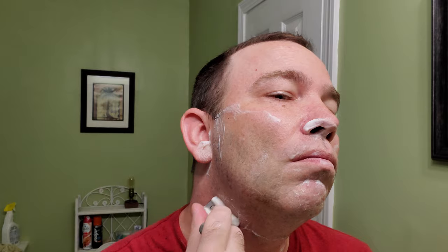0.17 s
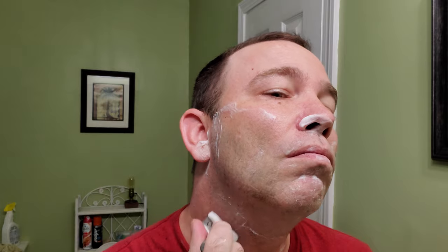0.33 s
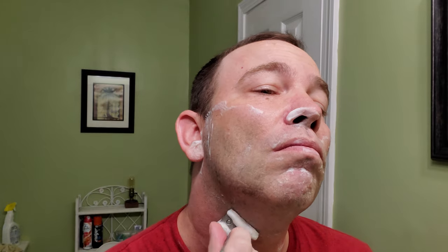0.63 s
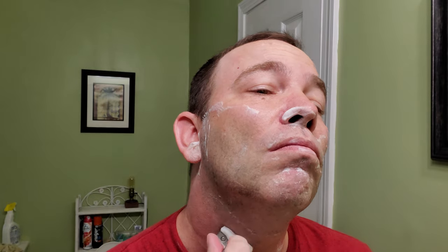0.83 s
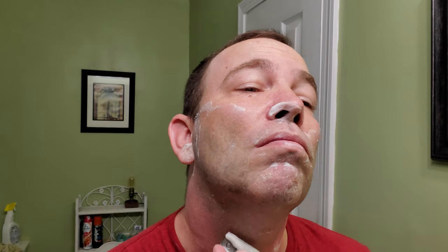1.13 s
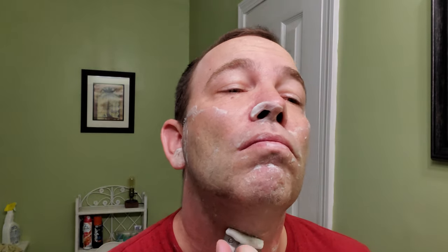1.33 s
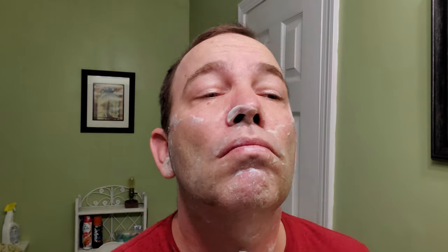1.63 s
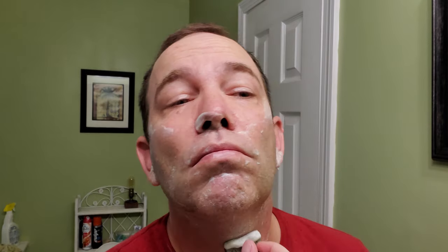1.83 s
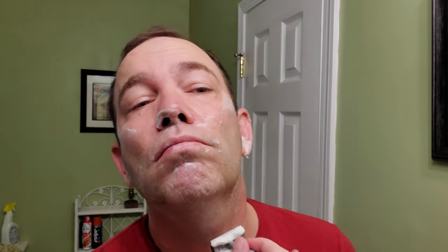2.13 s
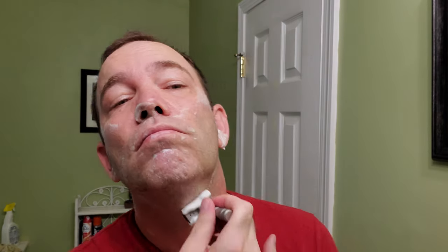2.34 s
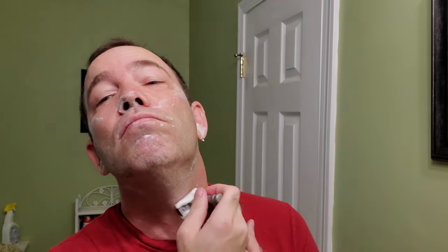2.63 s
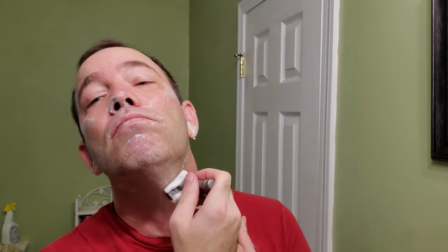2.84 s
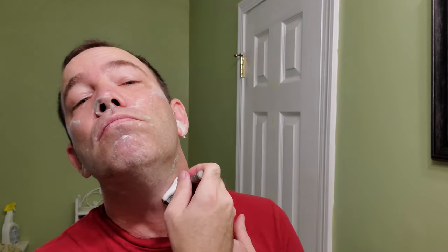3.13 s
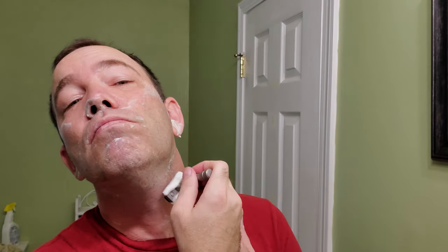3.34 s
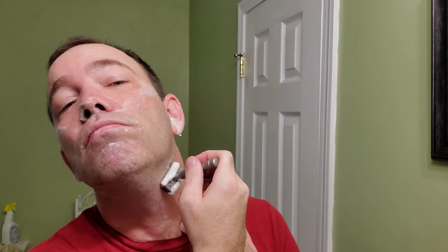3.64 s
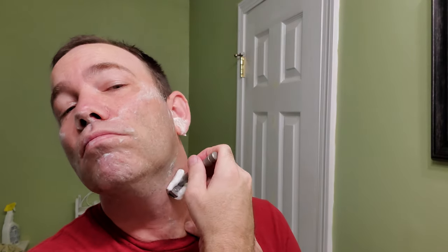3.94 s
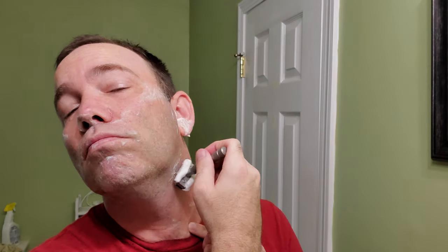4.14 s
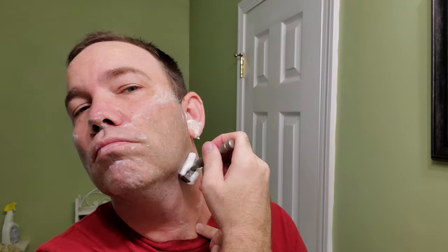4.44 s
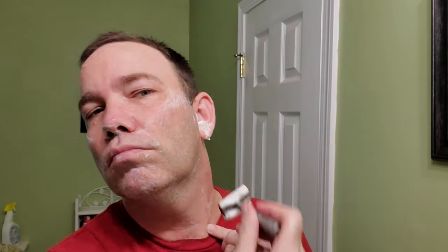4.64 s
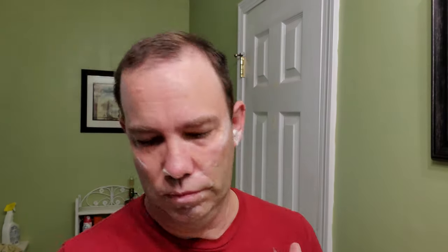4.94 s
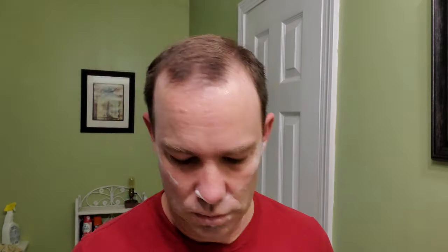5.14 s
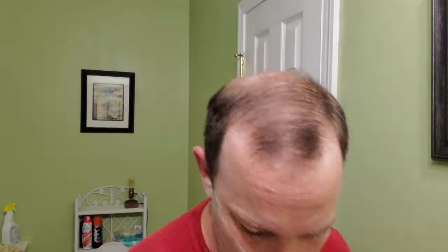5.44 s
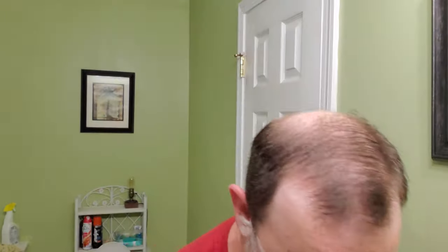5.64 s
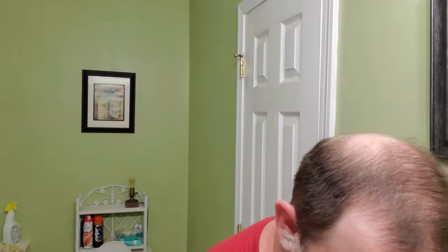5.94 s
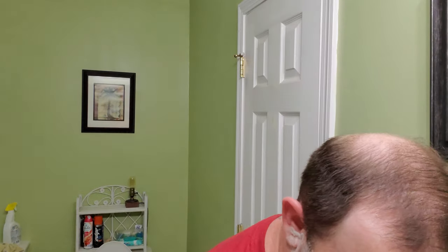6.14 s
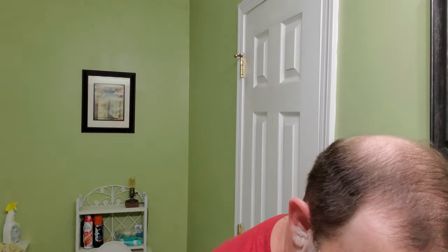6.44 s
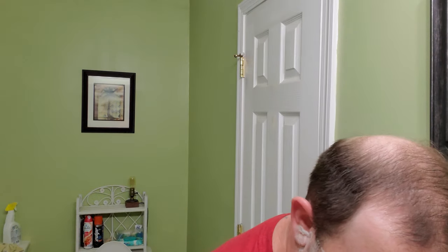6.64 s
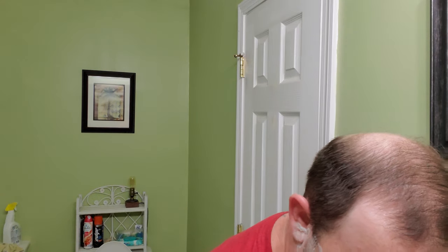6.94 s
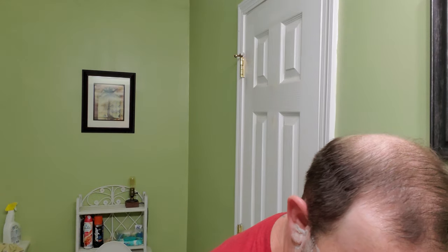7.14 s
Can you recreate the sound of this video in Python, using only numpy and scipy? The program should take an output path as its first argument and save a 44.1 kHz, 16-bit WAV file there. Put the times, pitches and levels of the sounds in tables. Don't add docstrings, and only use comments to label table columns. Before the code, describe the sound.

A razor scrapes wet stubble in short crisp strokes over a low room drone, then a tap squeaks and the blade is swished in bubbling water.

```python
import sys
import numpy as np
from scipy import signal
from scipy.fft import rfft, irfft, next_fast_len
from scipy.io import wavfile
from scipy.ndimage import uniform_filter1d

SR = 44100
rng = np.random.default_rng(int(sys.argv[2]) if len(sys.argv) > 2 else 0)


def linear_from_db(decibels):
    return 10 ** (np.asarray(decibels, float) / 20)


def dump_mix(stems):
    frames = np.atleast_2d(stems).T
    limited = np.clip(frames, -1, 1)
    pcm = np.round(limited * 32767).astype(np.int16)
    wavfile.write(sys.argv[1], SR, pcm)


N = 321048


def unit(x):
    return x / np.sqrt(np.mean(x ** 2) + 1e-20)


def along(points, hz):
    f, v = np.transpose(points)
    return np.interp(np.log(hz + 1), np.log(f + 1), v)


def sides(lead_db):
    return linear_from_db(np.array([[lead_db / 2], [-lead_db / 2]]))


def filtered(x, response):
    m = next_fast_len(N + SR // 2)
    return irfft(rfft(x, m) * response(np.fft.rfftfreq(m, 1 / SR)), m)[..., :N]


# f/Hz, likeness
ALIKE = [(60, 0.99), (130, 0.93), (290, 0.75), (640, 0.55), (1400, 0.18), (3000, 0.013)]


def pair_up(pair, hz):
    turn = np.arccos(np.clip(along(ALIKE, hz), 0, 1)) / 2
    mid, side = pair[0] * np.cos(turn), pair[1] * np.sin(turn)
    return np.array([mid + side, mid - side])


def rush(spectrum, grain=1):
    m = next_fast_len(N + SR // 5)
    hz = np.fft.rfftfreq(m, 1 / SR)
    z = rfft(grain * rng.standard_normal((2, N)), m) * linear_from_db(along(spectrum, hz))
    return unit(irfft(pair_up(z, hz), m)[:, :N])


def grains(rate, spread_db, life_s, bed):
    chance = rng.random((2, N))
    size_db = np.minimum(-spread_db * np.log(chance[1] + 1e-9), 4 * spread_db)
    kicks = (chance[0] < rate / SR) * linear_from_db(size_db)
    return unit(signal.lfilter([1], [1, -np.exp(-1 / (life_s * SR))], kicks)) + bed


def swells(s, peak_db, rise_s, fall_s, rest_db):
    t = np.arange(0, N + 128, 128)[:, None] / SR
    db = peak_db - 20 * np.where(t < s, (s - t) / np.abs(rise_s), (t - s) / np.abs(fall_s))
    return np.interp(np.arange(N) / SR, t[:, 0], 10 * np.log10(linear_from_db(2 * db).sum(1) + linear_from_db(2 * rest_db)))


def patchy(x, depth_db):
    z = signal.stft(x, nperseg=256)[2]
    field = uniform_filter1d(rng.standard_normal(z.shape[1:]), size=7, axis=0)
    field = uniform_filter1d(field, size=9, axis=1)
    return unit(signal.istft(z * linear_from_db(depth_db * unit(field)), nperseg=256)[1][:, :N])


def ringing(rows, rise, attack_s, lead_db, held=0):
    out = np.zeros((2, N + SR))
    for s, db, hz, t60 in rows:
        t = np.arange(round((held + t60) * SR)) / SR
        skew, side = rng.standard_normal(2)
        phase = 2 * np.pi * hz * (t + rise * t * t / (2 * t60)) + np.array([[0], [skew * hz / 1100]])
        envelope = linear_from_db(db - 60 * np.maximum(t - held, 0) / t60) * (1 - np.exp(-t / attack_s))
        out[:, round(s * SR):][:, :len(t)] += sides(lead_db + 1.8 * side) * envelope * np.sin(phase)
    return out[:, :N]


def held_ringing(rows, **settings):
    return sum(ringing([(s, db, hz, t60)], held=held, **settings) for s, db, hz, held, t60 in rows)


def spits(rows):
    out, t = np.zeros((2, N + 999)), np.arange(800) / SR
    f = np.fft.rfftfreq(len(t), 1 / SR) + 1
    width, t60 = 0.28, 0.014
    for s, db, hz in rows:
        colour = np.exp(-(np.log(f / hz) / width) ** 2)
        puff = unit(irfft(rfft(rng.standard_normal((2, len(t)))) * colour, len(t)))
        out[:, round(s * SR):][:, :len(t)] += linear_from_db(db - 60 * t / t60) * (1 - np.exp(-t / 0.00061)) * puff
    return sides(2.5) * out[:, :N]


# f/Hz, t60/s
TILES = [(300, 0.65), (1000, 0.23), (3000, 0.27), (8000, 0.27), (15000, 0.09)]


def walls(x):
    hz, t, z = signal.stft(rng.standard_normal((2, SR // 2)), SR, nperseg=256)
    decay = linear_from_db(-60 * t / along(TILES, hz)[:, None])
    tail = signal.istft(pair_up(z, hz[:, None]) * decay, SR, nperseg=256)[1]
    delayed = np.pad(x, ((0, 0), (150, 0)))
    return signal.fftconvolve(delayed, tail / np.linalg.norm(tail[0]), axes=1)[:, :N]


# f/Hz, level/dB per Hz
FAN = [(20, -44.5), (35, -15.5), (50, -11), (63, -2.5), (69, 2), (75, 3.5), (90, -20.5), (130, -57)]
# f/Hz, level/dB
MOTOR = [(228.3, -83), (302, -87)]
# f/Hz, level/dB per Hz
BOARDS = [(70, -40.5), (90, -4.5), (110, 7), (130, -7), (170, -17.5), (230, -15), (320, -22), (420, -52)]
# t/s, stand shake level/dB, boards level/dB
SWAYS = [(.64, -53, -70.5), (1.457, -55, -65.5), (2.09, -48, -62), (2.306, -58, -52), (2.63, -43.5, -62),
         (2.859, -49, -62.5), (3.28, -56.5, -56), (3.8, -68, -56), (4.476, -58, -56.5), (4.829, -63, -54),
         (5.198, -63, -60.5), (5.83, -45.5, -46), (6.41, -49.5, -54), (6.62, -52, -50.5), (6.85, -48, -53),
         (7.0, -47.5, -50), (7.2, -51, -55)]
# t/s, half length/s, level/dB
LULL = (5.13, 0.04, -25)
# t/s, peak level/dB, f/Hz, t60/s
BUMPS = [(2.036, -48, 79, 0.29), (2.259, -31, 116, 0.062), (2.278, -31.5, 110, 0.042),
         (2.265, -46, 320, 0.055), (2.322, -34.5, 85, 0.068), (2.351, -36, 90, 0.074),
         (2.048, -51, 166, 0.12), (2.563, -35.5, 68, 0.14), (3.39, -51, 64, 0.18),
         (3.649, -60.5, 86.1, 0.14), (3.746, -46, 115.6, 0.24), (4.484, -50.5, 124, 0.11),
         (4.949, -44.5, 143, 0.085), (5.781, -33, 73, 0.08), (5.804, -33.5, 70, 0.22)]


def floor(lull_db):
    s, stand_db, creak_db = np.transpose(SWAYS)
    fan_db = swells(s, stand_db, rise_s=0.17, fall_s=0.14, rest_db=-59.5) + lull_db
    boards_db = swells(s, creak_db, rise_s=0.15, fall_s=0.36, rest_db=-71) + lull_db
    lows = linear_from_db(fan_db) * rush(FAN) + linear_from_db(boards_db) * rush(BOARDS)
    lows += ringing(BUMPS, rise=-0.11, attack_s=0.0028, lead_db=0)
    t = np.arange(N) / SR
    for hz, db in MOTOR:
        drift = 2.5 * np.interp(t, np.linspace(0, N / SR, 30), rng.standard_normal(30))
        lows += linear_from_db(db + 2) * np.sin(2 * np.pi * hz * t + drift)
    return lows


# f/Hz, level/dB per Hz
CLOTHES = [(120, -10), (200, -4), (330, 0), (480, -3), (800, -12), (1300, -24), (4000, -48)]
# t/s, level/dB, rise/s, fall/s (for 20 dB)
RUSTLES = [(1.93, -65.5, 0.33, -0.1), (2.265, -58, .012, 0.35), (2.4, -79, .1, -3), (2.66, -71.5, .1, 0.32),
           (3.43, -64, 0.11, .15), (3.655, -64, 0.013, 0.29), (3.82, -67, 0.25, 0.2), (4.5, -77, .06, 0.1),
           (4.8, -65, 0.16, 0.46), (5.0, -65, 0.16, 0.15), (5.5, -65, 0.11, 1), (5.72, -65, 0.25, 0.56),
           (5.83, -42.5, 0.067, 0.13)]


def clothes(lull_db):
    sleeve = [(row[0], -80, .2, .2) for row in STROKE]
    level_db = swells(*np.transpose(RUSTLES + sleeve), -89) + 0.35 * lull_db
    return linear_from_db(level_db) * rush(CLOTHES, grains(rate=49, spread_db=-2, life_s=0.014, bed=1.8))


# f/Hz, level/dB per Hz
HISS = [(90, -40.5), (170, -7), (280, -11), (420, -28), (1100, -18), (4500, -25.5)]
HISS_TOP = [(8400, -34), (11000, -31), (16000, -33)]
# f/Hz, level/dB per Hz
COTTON = [(2500, -30), (4000, -1.5), (6500, 2.5), (8500, -12), (12000, -3.5), (16000, -7)]
# t/s, level/dB, rise/s, fall/s
COLLAR = [
    (4.75, -88, .25, .3),
    (4.98, -89, .25, .3),
    (5.2, -85, .2, .2),
]
# t/s, peak level/dB, f/Hz
TICKS = [
    (0.55, -75, 5400),
    (5.178, -68, 3800),
    (5.178, -72, 8480),
    (5.18, -72, 13000),
]


def room():
    middle, half, dip_db = LULL
    lull_db = dip_db * np.exp(-((np.arange(N) / SR - middle) / half) ** 2)
    lows = floor(lull_db) + clothes(lull_db)
    lows[1] = np.roll(lows[1], 4)
    collar = linear_from_db(swells(*np.transpose(COLLAR), -110)) * rush(COTTON)
    return sides(1.8) * lows + linear_from_db(-82) * rush(HISS + HISS_TOP) + collar + spits(TICKS)


TAP_S = 5.45
# t/s, surface level/dB, deep water level/dB
SWISHES = [(5.832, -38.5, -40.5), (5.97, -47, -51), (6.06, -43, -62), (6.285, -37, -50), (6.43, -44.5, -65),
           (6.549, -36, -86.5), (6.599, -33, -43), (6.678, -30, -55), (6.721, -35.5, -31), (6.8, -50, -22),
           (6.869, -29, -24), (6.97, -36, -26), (7.078, -34.5, -22.5), (7.19, -33, -33.5), (7.28, -30, -47)]


def flow():
    s, surface, deep = np.transpose(SWISHES)
    since = np.arange(N) / SR - TAP_S
    tap = linear_from_db(np.minimum(-80.5 + 45 * since, -65.5)) * np.clip(since / 0.068, 1e-3, 1)
    stir = linear_from_db(swells(s, surface, rise_s=0.094, fall_s=0.42, rest_db=-140))
    fizzing = linear_from_db(swells(s, surface, rise_s=0.094, fall_s=0.43, rest_db=-140))
    jet = (since > 0) * linear_from_db(-79)
    slosh_db = swells(s, deep, rise_s=0.031, fall_s=0.18, rest_db=-140)
    churn_db = 10 * np.log10(stir ** 2 + tap ** 2)
    fizz_db = -9 + 10 * np.log10(fizzing ** 2 + tap ** 2)
    spray_db = 10 * np.log10((linear_from_db(-15.5) * stir) ** 2 + tap ** 2 + jet ** 2)
    return slosh_db, churn_db, fizz_db, spray_db


def swarm(level_db, count, hz, spread, cycles):
    draw = rng.random((count, 3))
    s = TAP_S + draw[:, 0] * (N / SR - TAP_S) * .999
    odds = np.log(draw[:, 1] / (1 - draw[:, 1]) + 1e-9)
    pitch = hz * np.exp(spread * odds.clip(-2.5, 2.5))
    db = level_db[(s * SR).astype(int)] - 3 * np.log(draw[:, 2] + 0.2)
    return ringing(zip(s, db, pitch, cycles / pitch), rise=0.21, attack_s=0.0022, lead_db=3)


# f/Hz, level/dB per Hz
SLOSH = [(200, -33), (400, -0.5), (550, 5), (750, -1.5), (1000, 3), (1500, -41)]
CHURN = [(560, -47), (950, -5.5), (1300, -4.5), (1700, -0.5), (2400, -2.5), (3200, -6.5), (5600, -35)]
FIZZ = [(2100, -39), (3600, 0.5), (5000, -0.5), (6800, -6), (7800, -23), (11000, -45)]
SPRAY = [(3300, -15), (7500, -5), (10100, -3), (11800, 0), (13700, -7), (15200, -0.5), (16000, -24)]


def churning(slosh_db, churn_db, fizz_db, spray_db):
    lumps = rush(SLOSH, grains(rate=45, spread_db=-6, life_s=0.013, bed=0.59))
    surface = patchy(rush(CHURN, grains(rate=90, spread_db=3.5, life_s=0.004, bed=1.1)), depth_db=3)
    fine = grains(rate=250, spread_db=2, life_s=.003, bed=1.3)
    bed = linear_from_db(np.minimum(slosh_db - 2, -37)) * sides(1.51) * lumps
    bed += linear_from_db(churn_db - 4.5) * sides(4.5) * surface
    bed += linear_from_db(fizz_db - 3.5) * sides(1.7) * rush(FIZZ, fine)
    return bed + linear_from_db(spray_db - 2) * sides(1.5) * patchy(rush(SPRAY, fine), depth_db=2)


# t/s, peak level/dB, spray level/dB relative to the slap
SPLASHES = [(5.71, -60, 5), (5.823, -36.5, 6.5), (6.054, -35, -18), (6.212, -32, -13), (6.27, -44, -22),
            (6.3117, -31, -20), (6.458, -35, -21), (6.482, -35, -24), (6.5, -28, -18), (6.5663, -31, -15.5),
            (6.5734, -32, -23), (6.627, -28.5, -20), (6.671, -25.5, -5), (6.734, -34.5, 4.5),
            (6.7554, -48, -22), (6.7963, -31.5, -16), (6.853, -27, -11), (6.877, -19.5, -14),
            (6.986, -24.5, -12), (7.0553, -27, -22), (7.075, -21.5, -16), (7.144, -26.5, -7)]
# t/s, level/dB, t60/s
TICK = (5.709, -56, .09)


def splashes():
    (slap, flick), t = np.zeros((2, N + 999)), np.arange(900) / SR
    for s, db, spray in SPLASHES:
        start = round(s * SR)
        slap[start:][:len(t)] += linear_from_db(db + 2.5 - 60 * t / 0.036) * (1 - np.exp(-t / 0.0016))
        flick[start:][:len(t)] += linear_from_db(db + spray - 60 * t / 0.024) * (1 - np.exp(-t / 0.0012))
    s, db, t60 = TICK
    since = np.arange(SR // 9) / SR
    flick[round(s * SR):][:len(since)] += linear_from_db(db - 60 * since / t60)
    body = linear_from_db(-8.5) * rush(CHURN) + linear_from_db(-7.5) * rush(FIZZ)
    return slap[:N] * body + flick[:N] * rush(SPRAY)


# t/s, peak level/dB, f/Hz, t60/s
GLUGS = [(5.803, -30.5, 630, 0.019), (5.811, -27.5, 562, 0.052), (5.85, -34, 560, .05),
         (5.83, -34, 500, .05), (5.733, -46, 970, .03), (5.928, -37, 870, 0.036), (5.99, -36.5, 843, 0.036),
         (6.057, -27.5, 1010, 0.03), (6.269, -19, 990, .022), (6.294, -26, 1037, 0.027),
         (6.335, -33.5, 1020, 0.047), (6.515, -34.5, 986, 0.12), (6.582, -35.5, 758, 0.11),
         (6.788, -24, 824, 0.038), (7.178, -26, 934, 0.054), (6.065, -29.5, 967, 0.028),
         (6.372, -37, 1010, 0.027), (6.642, -32, 1060, 0.032), (6.789, -39, 424, .05),
         (6.866, -22.5, 558, 0.061), (6.91, -19, 633, 0.036), (6.755, -22, 986, 0.043),
         (6.868, -22.5, 860, 0.052), (6.925, -26.5, 754, 0.043), (6.105, -38, 1024, 0.081),
         (7.001, -25, 957, 0.049), (7.068, -22, 907, 0.059), (7.144, -24, 506, 0.041),
         (7.226, -27, 492.6, 0.13)]
# t/s, peak level/dB, f/Hz
DRIPS = [(5.783, -40, 2700), (5.8045, -33.5, 1375), (5.8324, -21.5, 2825), (5.8967, -30, 2400),
         (5.991, -42, 1350), (6.1188, -32, 2700), (6.2603, -25, 1870), (6.292, -18, 2990),
         (6.4075, -30.5, 1720), (6.458, -22.5, 4250), (6.4962, -26.5, 2630), (6.557, -20.5, 2760),
         (6.5816, -22.5, 3350), (6.5938, -24, 1670), (6.7973, -19, 5100), (6.8626, -15, 2450),
         (6.932, -22, 2540), (6.987, -19.5, 2440), (7.0046, -24, 1350), (7.0553, -22.5, 2920),
         (7.0753, -17, 4260), (7.099, -18.5, 1960), (7.1753, -29, 2990), (7.204, -31, 2410),
         (6.595, -19.5, 2510), (6.87, -17.5, 2850), (7.003, -21, 2570), (7.057, -21, 4800),
         (6.722, -20, 2300), (6.684, -20, 2320), (7.272, -24, 2480), (7.088, -27, 2540),
         (6.337, -35.5, 1600), (6.508, -29, 2250)]
# t/s, peak level/dB, f/Hz
HIGH_DROPS = [(5.7683, -51, 3200), (5.896, -34.5, 3950), (5.9289, -37.5, 4520), (5.9968, -43, 3260),
              (6.055, -34, 4560), (6.1863, -53, 3390), (6.2123, -39, 3120), (6.2402, -55, 3170),
              (6.27, -31, 3110), (6.3114, -30, 3000), (6.3668, -31, 3030), (6.4822, -35, 5000),
              (6.4983, -25.5, 4710), (6.6248, -23.5, 3510), (6.671, -21.5, 3270), (6.7262, -24, 3660),
              (6.7545, -30, 4020), (6.8765, -26, 4580), (6.9865, -21, 3570), (7.1482, -23.5, 4050),
              (7.206, -25.5, 3270), (7.256, -18, 3230)]
# t/s, peak level/dB, f/Hz
PLIPS = [
    (5.911, -38, 1790),
    (5.9288, -40, 1930),
    (6.0065, -37, 1730),
    (6.1945, -40, 1700),
    (6.2164, -32.5, 2730),
    (6.387, -34, 2010),
    (6.5056, -34, 2320),
    (6.6352, -29, 1590),
]
# t/s, peak level/dB, f/Hz
SPITS = [(5.744, -53, 11900), (5.812, -56, 9000), (6.042, -56, 11000), (6.058, -41.5, 12000),
         (6.096, -43, 8500), (6.2, -50, 13000), (6.282, -40, 12600), (6.345, -38.5, 9050),
         (6.466, -40.5, 10800), (6.522, -37.5, 11500), (6.555, -34, 6950), (6.637, -34, 11000),
         (6.822, -32, 15000), (7.008, -39, 12000), (7.062, -27, 12100), (7.089, -27.5, 7060),
         (7.202, -46, 8000), (7.229, -41, 13000), (7.256, -40, 11700), (7.274, -38, 9500)]
# t/s, level/dB, f/Hz, held/s, t60/s
HELD_DROPS = [
    (6.04, -32.5, 2360, 0.0052, 0.0054),
    (6.209, -39.5, 1620, 0.0077, .005),
    (5.828, -41, 2865, 0.0078, 0.015),
    (6.593, -32, 1701, 0.019, 0.024),
    (6.622, -36, 1600, 0.028, .015),
    (6.654, -31, 985, 0.026, 0.017),
    (6.704, -31.5, 1600, 0.017, .01),
    (6.706, -35.5, 800, 0.017, 0.0049),
    (6.677, -26, 2000, 0.01, .012),
    (7.255, -23, 2410, 0.0047, .006),
]


def bubbles(slosh_db, churn_db, fizz_db):
    wet = swarm(np.minimum(slosh_db - 0.5, -33), count=90, hz=733, spread=0.171, cycles=47)
    wet += swarm(churn_db, count=120, hz=2237, spread=0.2134, cycles=53)
    wet += swarm(fizz_db - 1, count=140, hz=4800, spread=0.15, cycles=23)
    wet += ringing(GLUGS, rise=0.037, attack_s=0.00069, lead_db=3)
    drips = [(s, db, hz, 30 / hz) for s, db, hz in DRIPS]
    drops = [(s, db + 2, hz, 40 / hz) for s, db, hz in HIGH_DROPS + PLIPS]
    wet += ringing(drips, rise=0.029, attack_s=0.00027, lead_db=9)
    wet += ringing(drops, rise=0.061, attack_s=0.00026, lead_db=7) + spits(SPITS)
    return wet + held_ringing(HELD_DROPS, rise=0.0064, attack_s=0.00031, lead_db=6.5)


# t/s, level/dB
CLANK = (5.822, -31)
# f/Hz, level/dB, t60/s
CHROME = [(2650, -2, .05), (8640, -6, .02), (10690, -10, .02), (11420, -2, .025), (14500, -6, .02)]


def clank():
    s, level_db = CLANK
    modes = [(s, level_db + db, hz, t60) for hz, db, t60 in CHROME]
    return ringing(modes, rise=0, attack_s=0.00064, lead_db=2)


# t/s, level/dB, f/Hz, held/s, t60/s
GULP = [
    (6.704, -15.5, 427, 0.023, 0.006),
    (6.733, -24.5, 427, 0.033, 0.091),
    (7.191, -25, 495.6, 0.016, 0.073),
]


def water():
    slosh_db, churn_db, fizz_db, spray_db = flow()
    bed = churning(slosh_db, churn_db, fizz_db, spray_db)
    wet = splashes() + bubbles(slosh_db, churn_db, fizz_db) + clank()
    pockets = held_ringing(GULP, rise=0.0083, attack_s=0.0012, lead_db=0.5)
    return bed + wet + pockets + walls(linear_from_db(-4.5) * wet + linear_from_db(-15) * pockets)


# start t/s, end t/s, start f/Hz, end f/Hz, level/dB
SQUEAK = [
    (5.437, 5.52, 10200, 15800, -76),
    (5.51, 5.6, 14000, 15500, -81),
    (5.46, 5.52, 11300, 12100, -74),
    (5.53, 5.57, 11000, 11200, -76),
    (5.575, 5.68, 11900, 11600, -71),
    (5.52, 5.6, 8400, 9000, -82),
    (5.51, 5.57, 5950, 6250, -79),
    (5.59, 5.68, 6600, 6200, -73),
    (5.62, 5.7, 15100, 14400, -77),
]
# f/Hz, level/dB per Hz
PIPE = [(400, -11), (850, -1.5), (1000, 1), (1250, -12), (1950, -17), (2170, -3.5), (2400, -27),
        (4000, -39)]


def squeak():
    out = np.zeros(N)
    rough = unit(uniform_filter1d(rng.standard_normal(N), size=90))
    for start, end, hz0, hz1, db in SQUEAK:
        span = slice(round(start * SR), round(end * SR))
        u = np.linspace(0, 1, span.stop - span.start)
        arch = np.sin(np.pi * u)
        hz = (hz0 + (hz1 - hz0) * u ** .6) * (1 + .03 * arch)
        phase = 2 * np.pi * np.cumsum(hz * (1 + 0.005 * rough[span])) / SR
        out[span] += linear_from_db(db - 1.5) * abs(arch) ** .5 * np.sin(phase)
    flow_db = swells(5.703, -63, rise_s=0.4, fall_s=0.36, rest_db=-140)
    whistle = linear_from_db(flow_db) * (np.arange(N) > TAP_S * SR) * rush(PIPE)
    return sides(5.4) * (out + whistle)


# t/s, rise/s, half the decay time/s, level/dB
SWIPE = (3.385, .018, .16, -67)
# f/Hz, level/dB per Hz
SKIN = [(250, -21), (700, -11), (1400, -4), (2300, -9), (3500, -4.5), (4500, -11), (7000, -17), (9000, -30)]


def swipe():
    s, rise, t60, db = SWIPE
    t = np.maximum(np.arange(N) / SR - s, 0)
    envelope = linear_from_db(db - 60 * np.maximum(t - .05, 0) / (2 * t60)) * (1 - np.exp(-t / rise))
    return envelope * rush(SKIN)


# f/Hz, level/dB per Hz
BLADE = [(4000, -26), (7000, -19.5), (9000, -15), (10600, -3.5), (12800, 3.5), (15000, 0.5), (16000, -4)]
# t/s, peak level/dB
SNAPS = [(0.1895, -38), (0.1965, -38), (0.5881, -50), (0.6065, -43), (0.6154, -41), (0.6354, -37),
         (0.6524, -36), (0.6687, -38), (0.7043, -48), (1.0021, -39), (1.022, -31), (1.0307, -31.5),
         (1.0412, -42), (1.4057, -40), (1.4305, -31), (1.4444, -37), (1.4686, -35), (1.9375, -49.5),
         (1.956, -45), (1.9764, -37.5), (1.9866, -27), (1.9934, -35), (2.0008, -25), (2.0107, -32),
         (2.0154, -39), (2.3271, -46), (2.4114, -43), (2.4174, -28), (2.422, -26.5), (2.425, -30),
         (2.4456, -23), (2.8254, -59), (3.2779, -51), (3.6476, -48.5), (4.0163, -54), (4.4777, -47)]


def snaps():
    out, t = np.zeros((2, N)), np.arange(160) / SR
    colour = linear_from_db(along(BLADE, np.fft.rfftfreq(len(t), 1 / SR)))
    for s, db in SNAPS:
        noise = irfft(rfft(rng.standard_normal((2, len(t)))) * colour, len(t))
        snap = sides(9.7) * noise * linear_from_db(-60 * t / 0.006) * (1 - np.exp(-t / 0.0007))
        out[:, round(s * SR):][:, :len(t)] += linear_from_db(db) * snap / abs(snap.mean(0)).max()
    return out


def resonance(f, centre, width):
    return 1j * f * width / (centre * centre - f * f + 1j * f * width)


# middle t/s, half length/s, cutting level/dB, rasp level/dB, rasp earlier by t/s
STROKE = [(0.211, 0.026, -50.5, -62, 0.039), (0.635, 0.054, -50.5, -64, 0.017),
          (1.007, 0.045, -53.5, -58.5, 0.027), (1.449, 0.049, -50, -63, 0.026),
          (1.989, 0.036, -41.5, -58, 0.022), (2.425, 0.051, -41, -60, 0.022),
          (2.85, 0.034, -54.5, -75.5, .03), (3.289, 0.064, -64.5, -69.5, 0.04),
          (3.664, 0.032, -60, -79.5, 0.041), (4.056, 0.1, -69, -74.5, 0.026),
          (4.462, 0.097, -67, -69, 0.033)]
# further earlier by t/s, rise/s, fall/s, share that tips over
RASP = [(0.027, 0.026, .1, 0.43), (-0.026, 0.11, 0.044, .1), (-0.0019, 0.068, 0.073, 0.11),
        (-0.012, 0.076, 0.048, 0.11), (0.0037, 0.055, 0.064, .1), (0.0049, .06, 0.056, .1),
        (0.0042, 0.053, .07, 0.22), (0.019, 0.052, 0.12, .7), (0.012, .03, 0.07, .2), (0, 0.069, 0.074, .9),
        (0.0059, 0.048, 0.085, 0.56)]
# f/Hz, width/Hz, level/dB
HEAD = [(1978, 830, -1), (1340, 720, -17)]
# f/Hz, width/Hz, level/dB, turn/s
TIPPED = (1582, 499.5, 1.5, .05)
# f/Hz, level/dB per Hz
GLIDE = [(300, -12.5), (1000, -17), (3500, -8.5), (4600, -2), (6800, -2.5), (8500, -13), (11000, -17.5)]


def razor():
    cut, rub, late, slide = np.zeros((4, 2, N))
    tip_hz, tip_width, tip_db, tip_s = TIPPED
    for (s, half, cut_db, rasp_db, early_s), (shift_s, rise_s, fall_s, tips) in zip(STROKE, RASP):
        near = slice(max(round((s - .3) * SR), 0), round((s + .3) * SR))
        t = np.arange(near.start, near.stop) / SR - s

        def bell(early, width):
            return sides(2.5) * linear_from_db(-14 * ((t + early) / width) ** 2)

        landed = np.clip((t + early_s + 2.1 * half) / 0.026, 0, 1)
        skirt = linear_from_db(-14) * bell(-0.02, 0.14) * (0.46 + 0.6 * landed)
        cut[:, near] += linear_from_db(cut_db - 2.5) * (bell(0, half) + skirt)
        top = early_s + shift_s
        press = linear_from_db(rasp_db) * bell(top, np.where(t < -top, rise_s, fall_s))
        tipped = np.clip(tips, 0, 1) * np.clip((t + top) / tip_s, 0, 1)
        rub[:, near] += press * np.sqrt(1 - tipped)
        late[:, near] += linear_from_db(tip_db) * press * np.sqrt(tipped)
        glide_db = (cut_db + rasp_db) / 2 - 14.5 + 154.5 * half
        slide[:, near] += linear_from_db(glide_db) * bell(0.0088, 0.069)
    cutting = cut * rush(BLADE, grains(rate=1200, spread_db=4, life_s=0.0007, bed=1))
    flat = grains(rate=660, spread_db=2.5, life_s=0.002, bed=1.4) * rng.standard_normal((2, N))
    edge = grains(rate=510, spread_db=0, life_s=0.0016, bed=2.6) * rng.standard_normal((2, N))
    rasp = rub * unit(filtered(flat, lambda f: sum(linear_from_db(db) * resonance(f, c, w) for c, w, db in HEAD) ** 2))
    rasp += late * unit(filtered(edge, lambda f: resonance(f, tip_hz, tip_width) ** 2))
    glide = slide * rush(GLIDE, grains(rate=300, spread_db=3.5, life_s=0.002, bed=1.2))
    return cutting + rasp + glide + snaps()


def scene():
    shave, handle = razor(), squeak()
    echo = walls(linear_from_db(-4.5) * shave + linear_from_db(1.5) * handle)
    return room() + water() + handle + swipe() + shave + echo


def top_cut(x):
    return signal.sosfilt(signal.butter(12, 17040, fs=SR, output="sos"), x)


# from f/Hz, under level/dB per bin
GATE = (12000, -113)


def record(dry):
    hz, _, z = signal.stft(dry, SR, nperseg=2048)
    power = uniform_filter1d(np.mean(abs(z) ** 2, 0), size=24, axis=0)
    power = power[::24].repeat(24, axis=0)[:len(hz)]
    keep = (hz[:, None] < GATE[0]) | (power > linear_from_db(2 * GATE[1]))
    gain = np.where(keep, 1, linear_from_db(-17)) * (hz[:, None] < 15900)
    mix = signal.istft(z * gain, SR, nperseg=2048)[1][:, :N]
    return top_cut(mix)


dry = scene()
out = record(dry)
dump_mix(out)
```